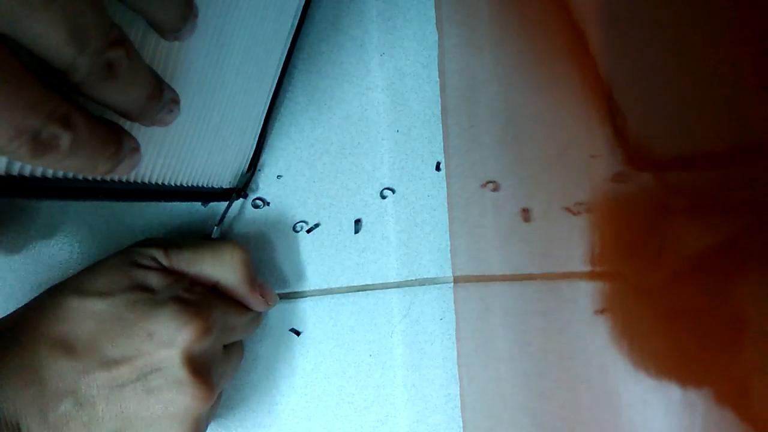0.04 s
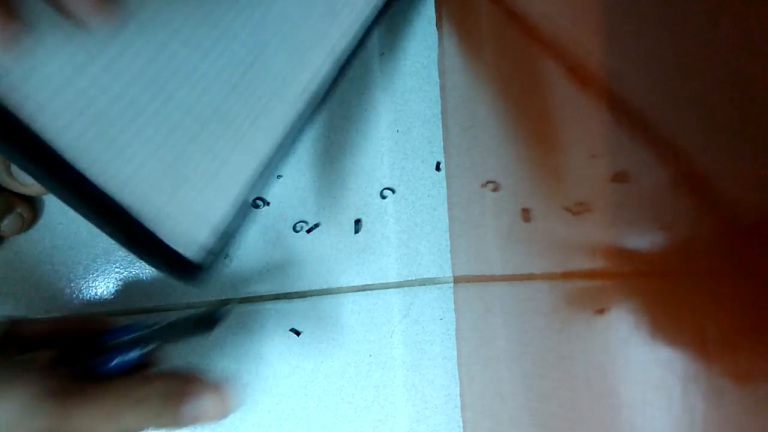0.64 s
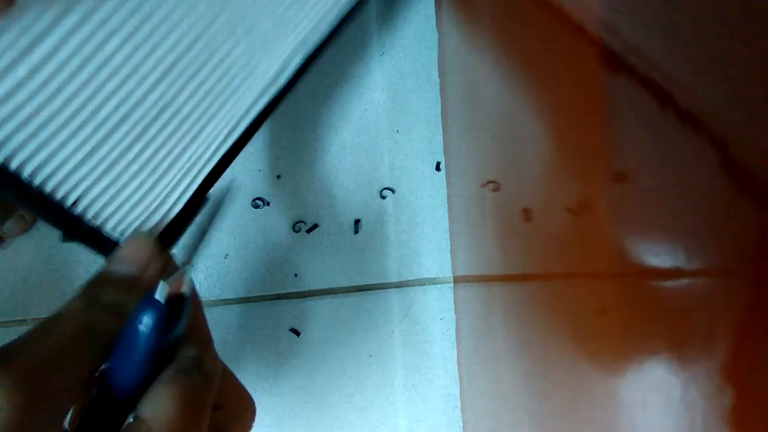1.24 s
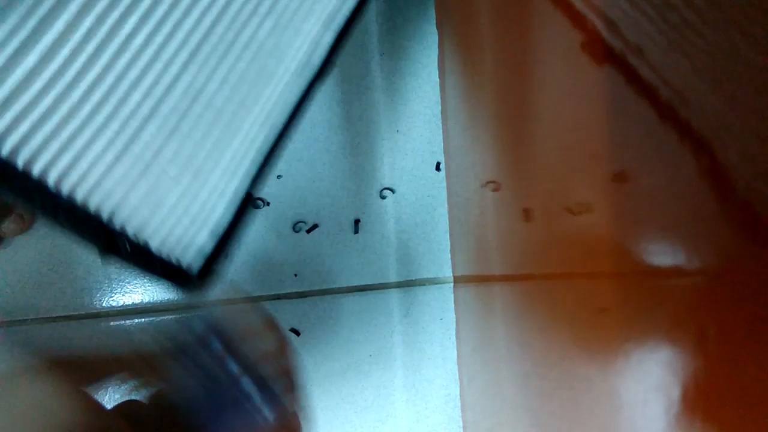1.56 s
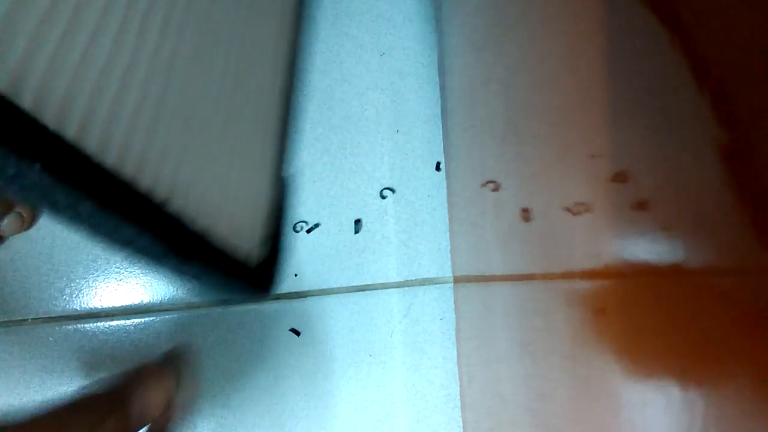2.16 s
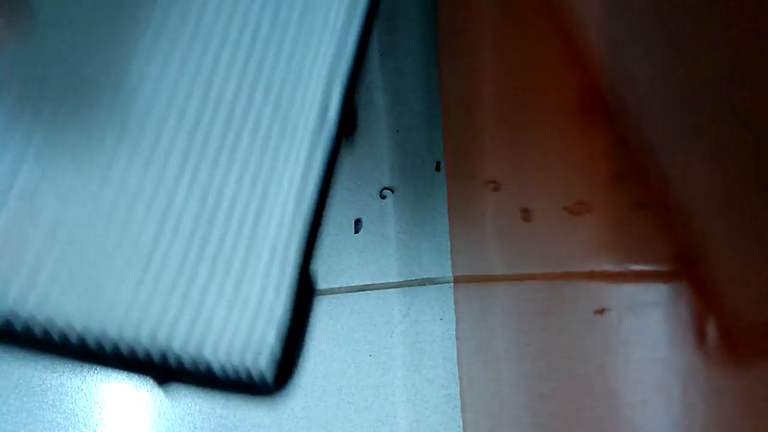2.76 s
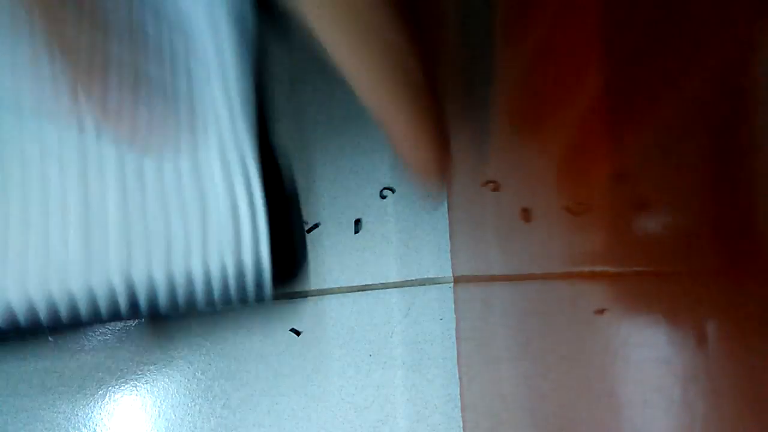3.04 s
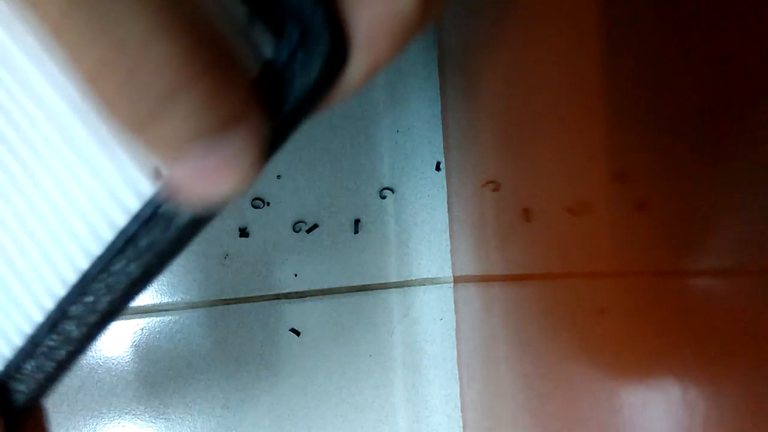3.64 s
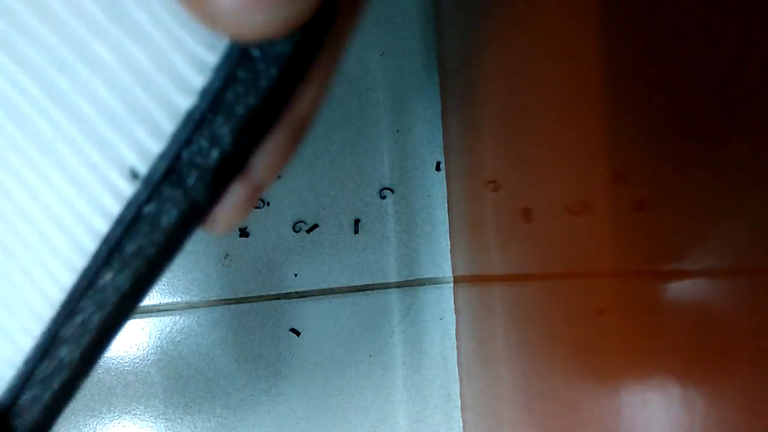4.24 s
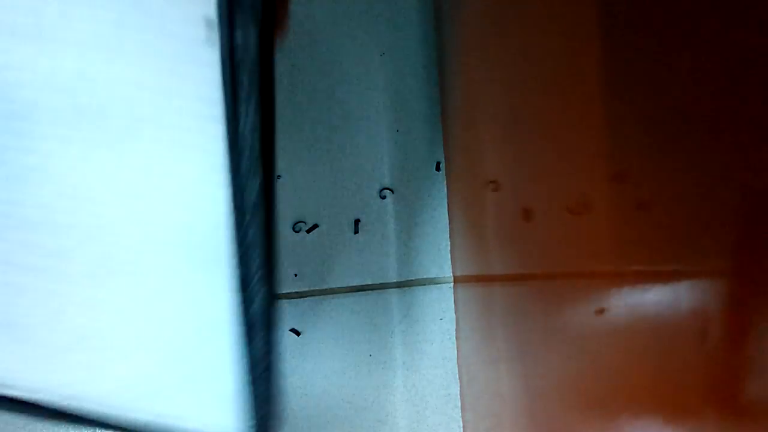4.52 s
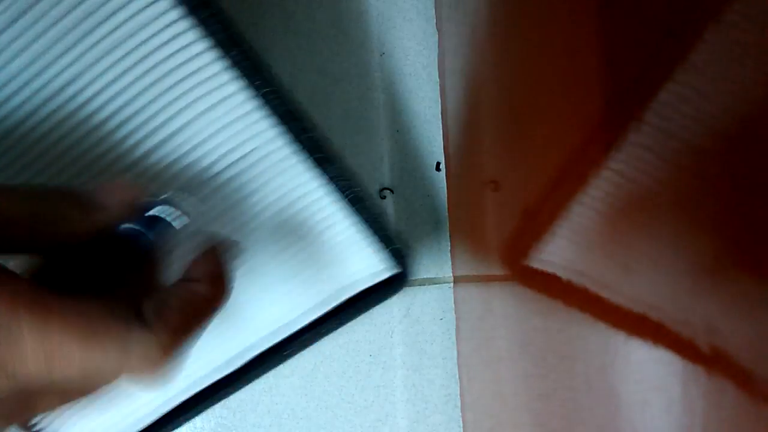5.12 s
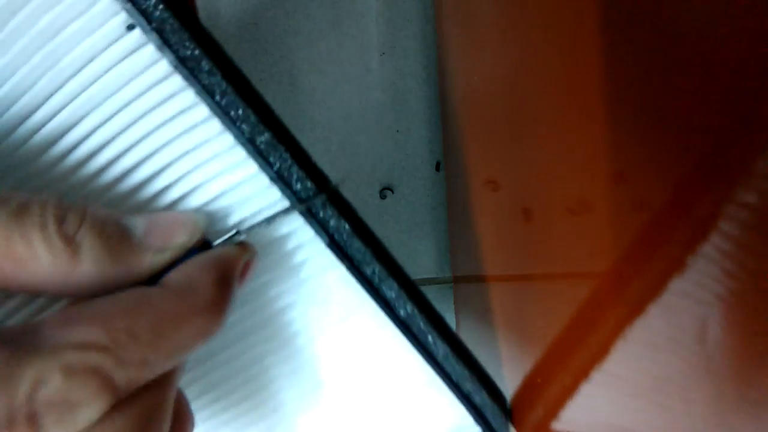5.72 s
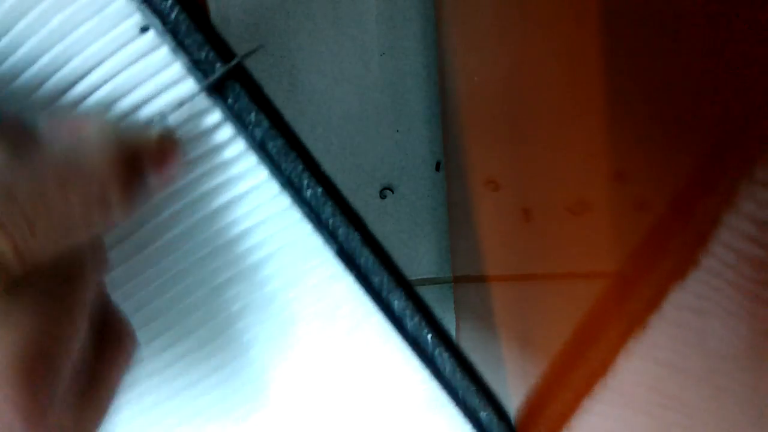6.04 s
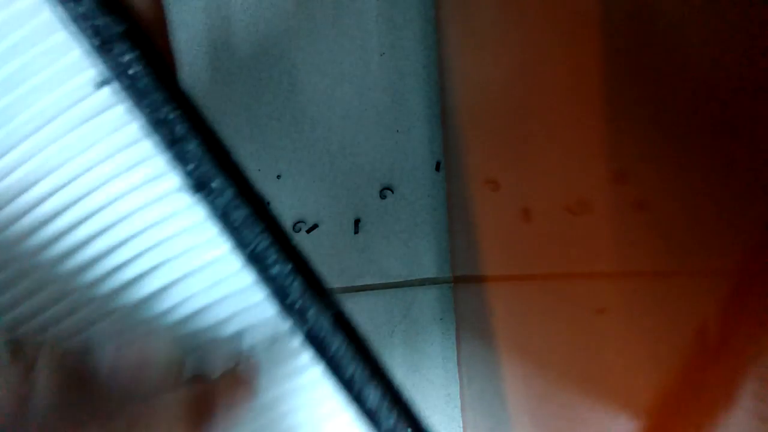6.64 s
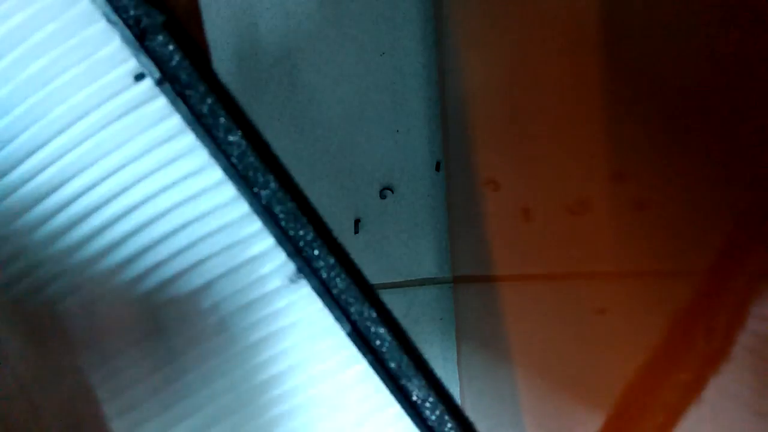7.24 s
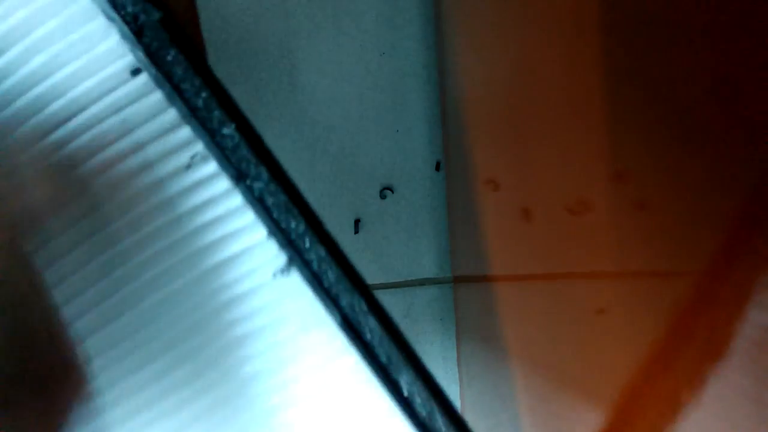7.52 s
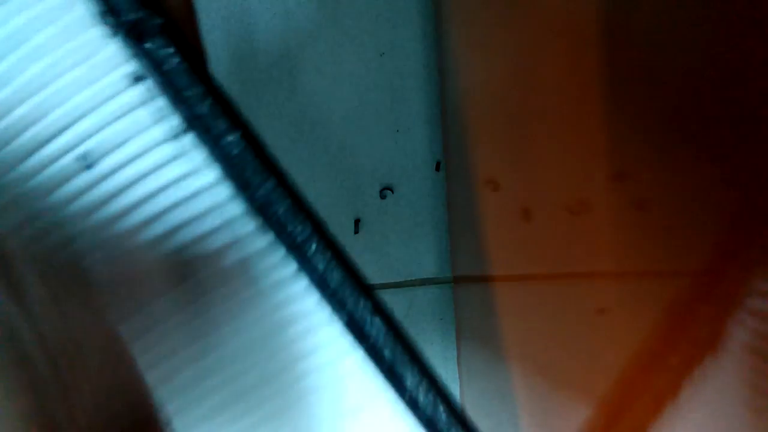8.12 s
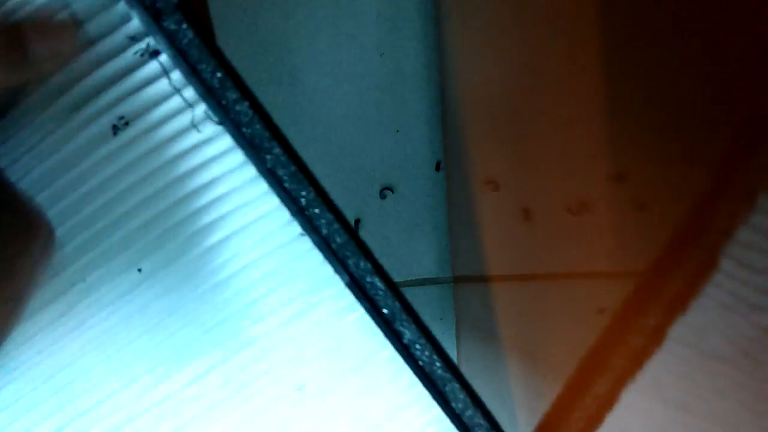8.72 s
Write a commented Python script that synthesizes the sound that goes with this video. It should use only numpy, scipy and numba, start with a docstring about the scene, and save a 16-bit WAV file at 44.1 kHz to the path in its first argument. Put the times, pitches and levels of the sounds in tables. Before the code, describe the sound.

Plastic drags and bumps on a hard floor before a utility knife shaves it in short, clicking, snapping strokes.

```python
"""A small hard room with a tiled floor, heard close by two spaced microphones.
A pleated filter panel with a plastic frame is dragged and turned: it scrapes, knocks and rumbles.
Fingers brush the pleats with a fine hiss. Then a utility knife trims the frame in ten strokes.
Each time the blade lands with a click and shaves along the edge in tiny slips that make the frame ring.
Now and then it snaps over a burr, a rough bit of plastic."""
import sys
import numpy as np
from scipy import signal
from scipy.fft import rfft, irfft, next_fast_len
from scipy.io import wavfile
from numba import njit

SR = 44100
rng = np.random.default_rng(int(sys.argv[2]) if len(sys.argv) > 2 else 0)


def waveform_to_disk(signal):
    """Save audio, clipped to [-1, 1], as 16-bit WAV at the path in sys.argv[1]."""
    frames = np.transpose(np.atleast_2d(signal))
    scaled = np.clip(frames, -1, 1) * 32767
    samples = np.round(scaled).astype(np.int16)
    wavfile.write(sys.argv[1], SR, samples)


N = 391166
TIME = np.arange(N) / SR

# A "colour" lists how strong a sound is at each frequency. "Pan" is left level minus right level.
# knife strokes: lands t/s, bite t/s, fast fade starts t/s, click level/dB, riding level/dB,
# bite level/dB, digging in rate/(dB/s), body vs cut level/dB, hiss vs cut level/dB,
# landing ring f/Hz, bite ring f/Hz
KNIFE_STROKES = [(5.722, 5.752, 5.77, -35, -46, -42, 141, -13, -10, 4840, 5200),
                 (5.852, 6.015, 6.07, -12.5, -35, -34, 74, -19.5, -10, 5040, 4520),
                 (6.253, 6.465, 6.64, -24, -41.5, -24, 174, -14.5, -10, 3850, 3840),
                 (6.742, 7.010, 7.07, -16, -33.5, -28, 323, -24, -9, 3350, 4880),
                 (7.273, 7.405, 7.39, -18, -37.5, -24.5, 109.5, -19.5, -2.5, 3800, 5130),
                 (7.553, 7.565, 7.54, -30, -38.5, -33, 200, -22, 0.5, 4700, 4650),
                 (7.693, 7.85, 7.9, -18.5, -35, -30, 75, -23.5, 0.5, 3500, 4500),
                 (8.149, 8.245, 8.28, -16, -35.5, -26.5, 154, -19.5, 3.5, 4500, 5640),
                 (8.549, 8.715, 8.74, -14.5, -36.5, -29.5, 104, -24, 1.5, 3440, 5000),
                 (8.84, 8.855, 8.88, -52, -52, -44, 150, -17, 2, 4870, 4700)]
# the palm sweeps along the frame: middle t/s, length/s, level/dB, pan/dB
PALM_SWEEPS = [(0.78, 0.11, -44.5, 10.5), (2.685, .04, -36, -4), (4.048, 0.039, -55.5, -20),
               (4.42, 0.12, -37, -0.5)]
# colour of the panel's body under the blade: f/Hz, level/dB
BODY_COLOUR = [(100, -9), (160, 2), (240, -7), (340, 7), (520, 0), (760, -1), (1000, -7), (1250, -10),
               (2000, -30)]
# colour of the blade's hiss and of sharp cracks: f/Hz, level/dB
HISS_COLOUR = [(5000, -22), (7500, 0), (9000, 1), (12000, -5.5), (14000, -6.5), (16000, -6)]


def from_db(db):
    return 10 ** (np.asarray(db) / 20)


def unit_rms(x):
    return x / np.sqrt(np.mean(x ** 2) + 1e-20)


def unit_energy(x):
    return x / np.sqrt(np.sum(x ** 2, axis=-1, keepdims=True))


def in_time(rows):
    """Joins timed rows with straight lines: one curve for each column after the time."""
    s, *columns = np.transpose(rows)
    return [np.interp(TIME, s, column) for column in columns]


def response(colour, size=4096):
    """The sound of one tap with this colour (a minimum-phase impulse response)."""
    hz, db = np.transpose(colour)
    grid = np.maximum(np.fft.rfftfreq(size, 1 / SR), 1)
    octaves_outside = np.abs(np.log2(grid / np.clip(grid, hz[0], hz[-1])))
    level = np.interp(np.log(grid), np.log(hz), db) - 18 * np.minimum(octaves_outside, 3)
    cepstrum = irfft(np.log(from_db(level)))[:size // 2]
    cepstrum[0] /= 2
    return irfft(np.exp(rfft(2 * cepstrum, size)))


def through(x, impulse):
    return signal.oaconvolve(x, impulse)[:len(x)]


def coloured(x, colour):
    """Gives plain noise a colour and keeps its power."""
    return through(x, unit_energy(response(colour)))


def add(out, start_s, sound):
    at = max(round(start_s * SR), 0)
    out[..., at:at + sound.shape[-1]] += sound[..., :N - at]


def panned(x, pan_db):
    """Shares a sound between left and right; their average stays the same."""
    ratio = from_db(pan_db)
    return np.array([x * ratio, x]) * 2 / (1 + ratio)


def drift(per_s):
    """A curve that wanders between random values, mostly within -1 and 1."""
    points = rng.standard_normal(int(N / SR * per_s) + 2)
    return np.interp(TIME * per_s, np.arange(len(points)), points)


def swell(middle_s, length_s, squareness):
    """Rises and fades; the higher the squareness, the flatter its top."""
    return np.exp(-np.minimum(np.abs(2 * (TIME - middle_s) / length_s), 9) ** squareness / 2)


def rubs(rows, squareness):
    """Left and right strength of a series of rubs."""
    return sum(panned(from_db(db) * swell(s, length_s, squareness), pan) for s, length_s, db, pan in rows)


def slips(per_s, spread_db, clump_db):
    """Rubbing surfaces stick and let go in tiny jerks of uneven size, louder in clumps."""
    sizes = from_db(spread_db * np.minimum(rng.exponential(1, N), 3)) * rng.choice([-1, 1], N)
    clumps = from_db(clump_db * drift(260))
    return unit_rms(sizes * (rng.random(N) < per_s / SR) * clumps)


def crack(decay_s, rise_s=0.00028, size=4096):
    """A burst of tiny breaks that dies within milliseconds."""
    t = np.arange(size) / SR
    return rng.choice([-1, 1], size) * np.exp(-t / decay_s) * (1 - np.exp(-t / rise_s))


def resonance(x, hz, width_hz):
    """Rings at one pitch; the smaller the width, the longer it rings."""
    r = np.exp(-np.pi * width_hz / SR)
    feedback = [1, -2 * r * np.cos(2 * np.pi * hz / SR), r * r]
    return signal.lfilter(np.array([1, 0, -1]) * (1 - r * r) / 2, feedback, x)


@njit
def gliding_resonance(x, hz, width_hz):
    """Rings at a pitch that can change with every sample."""
    angle, r = 2 * np.pi * hz / SR, np.exp(-np.pi * width_hz / SR)
    y = np.zeros(len(x))
    for i in range(2, len(x)):
        y[i] = 2 * r * np.cos(angle[i]) * y[i - 1] - r * r * y[i - 2] + x[i] - x[i - 2]
    return y


def on_frame(colour, direct):
    """One tap on the frame: some of the tap itself, plus the ringing it starts."""
    # the pitches at which the frame rings: f/Hz, width/Hz, level/dB
    frame_rings = [(368, 7.3, -13), (770, 87, -6), (970, 86, -5.5), (1710, 160, -21), (1975, 140, -30),
                   (2340, 420, -18), (3496, 127, -7.5), (3915, 33, -15), (4830, 110, -15),
                   (5770, 800, -11.5), (9090, 950, -4)]
    tap = response(colour)
    rings = sum(from_db(db) * resonance(tap, hz, width) for hz, width, db in frame_rings)
    return unit_energy(direct * tap + rings)


def background(air_db=-70.5):
    """Quiet room air and a thin, wandering whine."""
    # colour of the air: f/Hz, level/dB
    air_colour = [(21, -30), (35, -1.5), (49, -0.5), (114, -2), (420, -13), (778, -12), (1090, -16),
                  (1590, -19.5), (2870, -17), (4920, -25), (7810, -11), (14800, -20), (16000, -58)]
    # path of the whine: t/s, f/Hz, level/dB
    whine_path = [(0, 13600, -74), (.4, 13200, -73), (1.15, 14000, -72), (1.7, 13500, -73),
                  (2.05, 13850, -73), (2.6, 13150, -74), (4.5, 12900, -78), (6, 12600, -81),
                  (8.4, 13100, -80)]
    air = np.array([coloured(rng.standard_normal(N), air_colour) for side in range(2)])
    whine_hz, whine_db = in_time(whine_path)
    whine = np.sin(2 * np.pi * np.cumsum(whine_hz + 130 * drift(400)) / SR)
    return from_db(air_db) * air + from_db(whine_db) * whine


def room_echo(low_fade_s=.32, high_fade_s=.3, size=24000):
    """Hard walls echo, the highs dying first; a fade time is a drop of 60 dB."""
    t = np.arange(size) / SR
    dull, bright = rng.standard_normal((2, size))
    lowpass = signal.butter(1, 6000, fs=SR)
    lows = signal.lfilter(*lowpass, dull) * from_db(-60 * t / low_fade_s)
    highs = (bright - signal.lfilter(*lowpass, bright)) * from_db(-6 - 60 * t / high_fade_s)
    return unit_energy((lows + highs) * (1 - np.exp(-t / 0.0065)))


def nearby_bounces(x, split_hz=1900, decay_s=0.0027, count=6, size=400):
    """Lows arrive straight; highs bounce off panel, hand and tile by paths that shift at random."""
    low = signal.sosfilt(signal.butter(2, split_hz, "low", fs=SR, output="sos"), x)
    high = signal.sosfilt(signal.butter(2, split_hz, "high", fs=SR, output="sos"), x)
    paths = unit_energy(rng.standard_normal((count, size)) * np.exp(-np.arange(size) / SR / decay_s))
    shares = unit_energy(np.transpose([drift(35) for path in paths])).T
    bounced = sum(share * through(high, path) for share, path in zip(shares, paths))
    return low - .3 * high + .95 * bounced


def at_microphone(x, lag_s, room_db=-8):
    """A sound reaches one microphone with its bounces and the room's echo."""
    heard = nearby_bounces(x) + from_db(room_db) * through(x, room_echo())
    return np.pad(heard, (round(lag_s * SR), 0))[:N]


def microphone_colour(x):
    """The left microphone is duller than the right."""
    # balance of the two microphones: f/Hz, pan/dB
    balance = [(100, 0), (350, -5), (900, -4), (2500, -2), (6000, 0), (9500, -2), (12000, -8), (15000, -17)]
    hz, db = np.transpose(balance)
    size = next_fast_len(N + 2048)
    grid = np.maximum(np.fft.rfftfreq(size, 1 / SR), 1)
    gains = panned(np.ones(len(grid)), np.interp(np.log(grid), np.log(hz), db))
    return irfft(rfft(x, size) * gains, size)[:, :N]


def rumble(panel_hz=96, held_from_s=3.3, held_db=-70.5, push_db=-36):
    """The panel bends and booms as it is moved; once held, faintly, and more as knife or palm push."""
    # the panel rocking as it is moved: t/s, level/dB
    rocking = [(0.0, -48), (0.45, -52), (0.52, -43), (0.6, -58), (0.65, -45.5), (0.86, -65), (1.59, -87),
               (1.61, -71), (2.03, -59), (2.1, -37), (2.91, -51.5), (3.15, -90)]
    # colour of the rumble: f/Hz, level/dB
    rumble_colour = [(35, -31.5), (50, -8), (65, -2), (96, 2), (125, -1), (165, -2.5), (220, -10),
                     (330, -17)]
    moved_db, = in_time(rocking)
    pushed = stroke_curves()[0] + rubs(PALM_SWEEPS, squareness=4).mean(axis=0)
    strength = from_db(np.where(TIME < held_from_s, moved_db, held_db)) + from_db(push_db) * pushed
    shaking = coloured(rng.standard_normal(N), rumble_colour)
    boom = unit_rms(shaking + 2.2 * resonance(shaking, panel_hz, width_hz=8))
    stereo_spread = coloured(rng.standard_normal(N), rumble_colour) * from_db(-15)
    return strength * np.array([boom + stereo_spread, boom - stereo_spread])


def twang(start_s=1.615, hz=290, apart_hz=13, level_db=-62, fade_s=0.48):
    """Let go, the panel rings faintly at two close pitches that throb against each other."""
    age = np.maximum(TIME - start_s, 0)
    tones = np.sin(2 * np.pi * hz * age) + 0.98 * np.sin(2 * np.pi * (hz + apart_hz) * age)
    return from_db(level_db - 60 * age / fade_s) * tones


def bumps(gain_db=-1, delay_s=.002):
    """Dull low thuds from the panel and from handling the microphone."""
    # thuds: t/s, level/dB, pan/dB
    thuds = [(0.63, -32.5, -24), (2.095, -31, -4), (2.243, -29, -1), (2.385, -28, -2), (3.975, -29.5, -32),
             (4.743, -39, -30), (6.468, -44, -13), (6.74, -38.5, -5), (7.272, -34.5, -7), (8.15, -44, -13),
             (8.548, -32, -8.5)]
    # colour of a thud: f/Hz, level/dB
    thud_colour = [(30, -29.5), (60, 2.5), (110, -5), (200, -10.5), (400, -18.5), (1200, -29), (3000, -41),
                   (8000, -60.5)]
    out, thud = np.zeros((2, N)), response(thud_colour)
    for s, db, pan_db in thuds:
        add(out, s + delay_s, panned(from_db(db + gain_db) * thud / np.abs(thud).max(), pan_db))
    return out


def squeak(hz=3000, width_hz=60, level_db=-62):
    """A finger squeaks briefly on the frame."""
    tone = unit_rms(resonance(resonance(rng.standard_normal(N), hz, width_hz), hz, width_hz))
    strength = from_db(level_db) * swell(middle_s=3.515, length_s=0.032, squareness=2.3)
    return panned(strength * tone, pan_db=-20)


def hands(brush_gain_db=-2, palm_gain_db=-1, resting_db=-69, resting_until_s=5.25):
    """Fingers on the pleats give a fine high hiss, even at rest; the palm on the frame a fuller one."""
    # fingers stroke the pleats: middle t/s, length/s, level/dB, pan/dB
    finger_strokes = [(0.25, 0.36, -58.5, 21), (0.57, 0.15, -51.5, -3), (0.9, 0.18, -59, 3),
                      (1.23, 0.037, -61.5, -10), (1.39, 0.13, -51.5, 10.5), (1.655, 0.044, -49, 0.5),
                      (1.77, 0.036, -62.5, -9), (2.05, 0.23, -61, 4.5), (2.56, 0.13, -51.5, 5),
                      (2.81, 0.15, -47, 1.5), (3.09, 0.13, -64, 21), (3.47, 0.24, -56.5, -10),
                      (3.73, 0.14, -55, -15.5), (4.18, .04, -52, -20.5), (4.29, 0.043, -56.5, -16),
                      (4.74, 0.03, -60.5, -24.5), (4.92, 0.1, -59.5, -14.5), (5.21, 0.035, -59.5, -4)]
    # colour of skin on the pleats: f/Hz, level/dB
    pleat_colour = [(3000, -22.5), (5000, -17), (6300, -5.5), (7600, 1), (10000, -3.5), (12500, -7.5),
                    (15500, -6.5)]
    # colour of the palm on the frame: f/Hz, level/dB
    palm_colour = [(120, -33.5), (200, -16.5), (259, -15), (548, -23), (709, -32.5), (1250, -29),
                   (1590, -20.5), (3970, -9), (5230, -3.5), (7270, -8), (9930, -10), (13600, -14.5),
                   (16000, -16)]
    resting = from_db(resting_db) * np.clip((resting_until_s - TIME) * 10, 0, 1)
    brushing = from_db(brush_gain_db) * rubs(finger_strokes, squareness=2.45)
    sweeping = from_db(palm_gain_db) * rubs(PALM_SWEEPS, squareness=3.6)
    fingers = coloured(rng.standard_normal(N), pleat_colour) * (resting + brushing)
    palm = coloured(slips(per_s=13000, spread_db=1.5, clump_db=2.0), palm_colour) * sweeping
    return fingers + palm


def sliding(drag_gain_db=3, grit_gain_db=1, fade_s=0.06):
    """The frame drags over dusty tile, its corner catching and letting go."""
    # long slides, one table each: t/s, drag level/dB, grit level/dB
    slides = [
        [(0.0, -45, -41.5), (0.076, -53.5, -59), (0.276, -55, -55.5), (0.494, -49.5, -52.5),
         (0.61, -63.5, -59.5), (0.66, -50.5, -48.5)],
        [(1.9, -76.5, -88), (1.914, -77, -69.5), (1.948, -63, -51.5), (1.994, -60.5, -44), (2.172, -47, -53.5),
         (2.37, -54.5, -56.5)],
        [(2.48, -56, -50.5), (2.654, -53, -52), (2.694, -74, -47), (2.708, -62.5, -49.5), (2.934, -54.5, -50),
         (3.06, -101, -78.5)],
    ]
    # short scuffs: middle t/s, length/s, drag level/dB, grit level/dB
    scuffs = [(1.385, 0.12, -78, -66), (1.642, 0.038, -53, -56), (3.12, 0.11, -86, -67.5),
              (3.376, 0.05, -63, -49.5), (3.517, 0.031, -61, -59.5), (4.046, .03, -65, -69),
              (4.518, 0.034, -63.5, -58), (4.746, 0.033, -75, -61), (5.163, 0.098, -60.5, -51),
              (5.383, 0.036, -63, -52), (5.423, .11, -50, -63.5), (5.85, 0.29, -58, -82)]
    # the corner catches: t/s, level/dB
    catches = [(2.527, -33.5), (2.632, -32), (2.71, -33.5), (2.777, -36.5), (2.824, -31), (2.85, -31),
               (2.916, -31), (2.937, -36)]
    # colour of the dragging frame: f/Hz, level/dB
    drag_colour = [(120, -16), (200, -8), (241, -8), (275, -14), (591, -8.5), (769, -7), (1210, -13.5),
                   (1900, -18), (2470, -24.5), (4180, -120)]
    # colour of the grit under it: f/Hz, level/dB
    grit_colour = [(590, -36.5), (1000, -5.5), (1550, -24), (2330, -2), (4470, -4), (5040, -3),
                   (7270, -10.5), (8000, -8), (10400, -51.5), (17600, -120)]
    # colour of a catch: f/Hz, level/dB
    catch_colour = [(150, -5), (330, -5.5), (480, 3.5), (680, -8.5), (900, -42), (2000, -50)]
    spans = [(slide[0][0], slide[-1][0]) for slide in slides]
    moving = sum(np.interp(TIME, [s - .002, s, end, end + fade_s], [0, 1, 1, 0]) for s, end in spans)
    drag_db, grit_db = in_time(np.concatenate(slides))
    drag_force = moving * from_db(drag_db + drag_gain_db)
    grit_force = moving * from_db(grit_db + grit_gain_db)
    for s, length_s, scuff_drag_db, scuff_grit_db in scuffs:
        scuff = swell(s, length_s, squareness=2.65)
        drag_force += scuff * from_db(scuff_drag_db)
        grit_force += scuff * from_db(scuff_grit_db)
    drag = coloured(slips(per_s=1200, spread_db=2.5, clump_db=1.5) * drag_force, drag_colour)
    grit = coloured(slips(per_s=9800, spread_db=3.0, clump_db=0.5) * grit_force, grit_colour)
    judder, catch = np.zeros(N), response(catch_colour)
    for s, db in catches:
        add(judder, s, from_db(db) * catch / np.abs(catch).max())
    return panned(drag + grit + judder, pan_db=6.0)


def knocks(gain_db=-7, ring_db=-5, crack_gain_db=7):
    """The frame lands on the tile with a hollow clack."""
    # hits on the tile: t/s, level/dB, ring f/Hz, relative crack level/dB
    hits = [(0.676, -21, 2200, -19.5), (2.384, -11.5, 1870, -35), (2.395, -19.5, 1750, -32),
            (3.335, -28.5, 2840, -8), (5.101, -22, 3120, -9)]
    # colour of a knock: f/Hz, level/dB
    knock_colour = [(150, -20), (330, -7), (550, -23.5), (900, -4.5), (1300, -16.5), (1750, -13),
                    (2100, -6), (2350, -19), (2650, -6.5), (3100, -8.5), (3700, -9.5), (5000, -21),
                    (9000, -35.5)]
    out = np.zeros(N)
    for s, db, hz, crack_db in hits:
        burst = crack(decay_s=0.0046)
        hollow = unit_rms(coloured(burst, knock_colour))
        ring = from_db(ring_db) * unit_rms(resonance(burst, hz, width_hz=350))
        sharp = from_db(crack_db + crack_gain_db) * coloured(burst, HISS_COLOUR)
        add(out, s, from_db(db + gain_db) * ((hollow + ring) * burst.std() + sharp))
    return panned(out, pan_db=-1.5)


def clicks(gain_db=-8, ring_db=-4, crack_gain_db=9, delay_s=.0005):
    """The blade lands, burrs snap and the frame ticks; each click leaves a short ring."""
    # snapping burrs and ticks of the frame: t/s, level/dB, ring f/Hz, relative crack level/dB, pan/dB
    snaps = [(0.673, -10, 4670, -12, -0.5), (1.209, -44.5, 3930, -1, -7), (1.613, -40, 7150, -1.5, -11),
             (2.557, -28, 3540, -15, -4), (4.832, -42, 8100, -5, -7), (5.365, -29, 5260, -5, -4),
             (5.752, -22.5, 5220, -25, 6), (6.173, -31, 3940, -10, -6), (6.333, -22, 2500, -16, -7),
             (6.365, -19, 2330, -10, -2), (6.442, -13, 2710, -6, -10), (6.454, -12, 3340, -9, -7),
             (6.469, -6, 3580, -11, -7), (6.476, -2.5, 3660, -10.5, 3.5), (6.691, -32.5, 3510, -9, 2),
             (7.001, -11, 4440, -14, -2), (7.404, -16.5, 4600, -2.5, -12), (7.473, -10.5, 4600, -6.5, 0.5),
             (7.864, -15.5, 3500, -6.5, 1), (7.992, -40, 6400, 5.5, -2), (8.101, -48.5, 7720, -0.5, -17),
             (8.232, -15.5, 5940, -5, -15), (8.276, -13, 6060, -11.5, -8), (8.31, -17, 2330, -7, 1.5),
             (8.325, -13.5, 1790, -14.5, -7), (8.381, -21, 8360, -4.5, 7)]
    # colour of a snap: f/Hz, level/dB
    snap_colour = [(700, -17.5), (1300, -7), (1800, -3.5), (3500, 7.5), (6000, 5), (8000, -7),
                   (12000, -25.5)]
    out = np.zeros((2, N))
    snap, body = on_frame(snap_colour, direct=0.79), on_frame(BODY_COLOUR, direct=0.38)

    def click(s, db, hz, crack_db, pan_db, body_db, decay_s):
        burst = crack(decay_s)
        ring = unit_rms(resonance(burst, hz, width_hz=550)) * burst.std()
        sound = through(burst, snap) + from_db(ring_db) * ring
        sound += from_db(body_db) * through(burst, body)
        sound += from_db(crack_db + crack_gain_db) * coloured(burst, HISS_COLOUR)
        add(out, s + delay_s, panned(from_db(db + gain_db) * sound, pan_db))

    for lands, _, _, db, *_, landing_hz, _ in KNIFE_STROKES:
        click(lands, db, landing_hz, crack_db=-12, pan_db=-6.5, body_db=-14.5, decay_s=0.004)
    for row in snaps:
        click(*row, body_db=-19, decay_s=0.0033)
    return out


def stroke_curves(attack_s=0.0078):
    """Strength of cut, body and hiss, and ring pitch: strokes swell and die away, some fading early."""
    sag_rate, ease_rate, fast_fade_rate = 29, 103, 418  # dB/s
    body_fade_rate, hiss_fade_rate = 138, 53  # extra dB/s after the bite
    cut, body, hiss = np.zeros((3, N))
    ring_hz = np.full(N, float(KNIFE_STROKES[0][-1]))
    for stroke in KNIFE_STROKES:
        lands, bite, fades, _, ride_db, bite_db, dig_rate, body_db, hiss_db, landing_hz, bite_hz = stroke
        span = slice(int(lands * SR), int((fades + .2) * SR))
        t = TIME[span]
        before, past = np.maximum(bite - t, 0), np.maximum(t - bite, 0)
        riding = from_db(ride_db - sag_rate * (t - lands))
        biting = from_db(bite_db - dig_rate * before - ease_rate * past)
        attack = np.clip((t - lands) / attack_s, 0, 1)
        fast_fade = from_db(-fast_fade_rate * np.maximum(t - fades, 0))
        force = attack * fast_fade * np.hypot(riding, biting)
        cut[span] += force
        body[span] += force * from_db(body_db - body_fade_rate * past)
        hiss[span] += force * from_db(hiss_db - hiss_fade_rate * past)
        ring_hz[span] = np.interp(t, [lands, bite], [landing_hz, bite_hz])
    return cut, body, hiss, ring_hz


def shaving(ring_width_hz=450, ring_db=-6, cut_gain_db=-1, hiss_gain_db=-1, give_way_db=-28):
    """The blade tears the plastic in fine slips and coarser catches; the ring glides as the cut moves."""
    # colour of the cut: f/Hz, level/dB
    cut_colour = [(1000, -24), (1250, -16), (1700, -7), (2800, -4), (3500, 1), (4700, 0), (6500, -1),
                  (8000, -4), (10000, -9), (16000, -17)]
    cut_force, body_force, hiss_force, ring_hz = stroke_curves()
    fine = slips(per_s=8000, spread_db=3.0, clump_db=0.0)
    catches = slips(per_s=200, spread_db=1.5, clump_db=1.0)
    unsteady_hand = from_db(1.45 * drift(40))
    tearing = unit_rms(fine + from_db(-4) * catches) * unsteady_hand
    # the plastic gives way, so pushing harder makes the cut no louder
    force = tearing * np.minimum(cut_force * from_db(cut_gain_db), from_db(give_way_db))
    cut = through(force, on_frame(cut_colour, direct=.22))
    ring = from_db(ring_db) * unit_rms(gliding_resonance(force, ring_hz, ring_width_hz)) * force.std()
    body_wobble = from_db(3.5 * drift(30))
    body = through(tearing * body_force * body_wobble, on_frame(BODY_COLOUR, direct=0.38))
    hiss = coloured(tearing * hiss_force * from_db(hiss_gain_db), HISS_COLOUR)
    return panned(cut + ring + body + hiss, pan_db=-0.5)


def scene():
    """Knife, frame and hands at two microphones, over thuds, twang, rumble and room air."""
    left, right = shaving() + clicks() + knocks() + sliding() + hands() + squeak()
    heard = np.array([at_microphone(left, lag_s=.00045), at_microphone(right, lag_s=0)])
    return microphone_colour(heard) + bumps() + twang() + rumble() + background()


def record(dry):
    """Rounds off loud peaks and cuts the very highest sounds."""
    lowpass = signal.ellip(10, .3, 70, 16100, fs=SR, output="sos")
    return signal.sosfilt(lowpass, np.tanh(dry))


dry = scene()
out = record(dry)
waveform_to_disk(out)
```